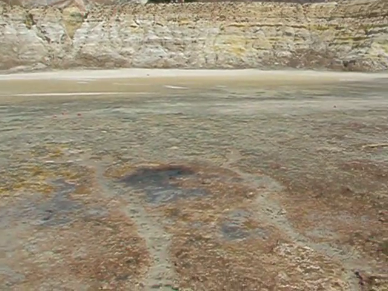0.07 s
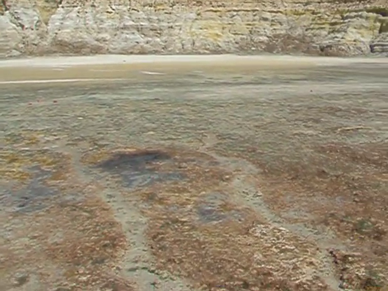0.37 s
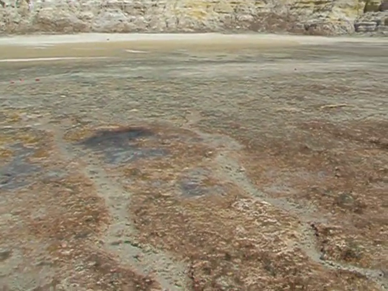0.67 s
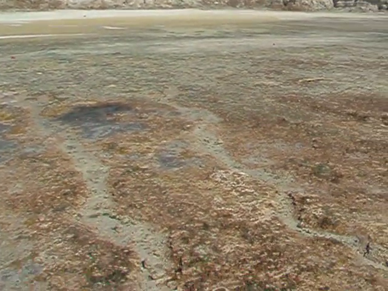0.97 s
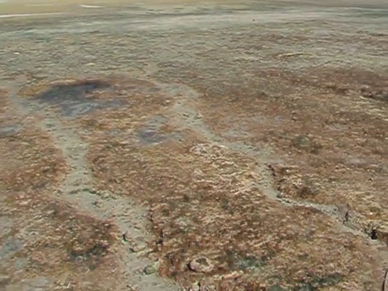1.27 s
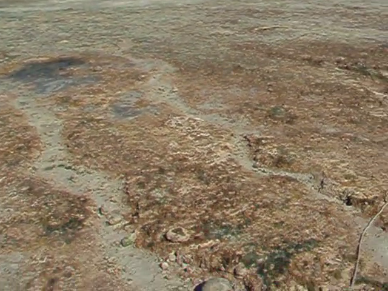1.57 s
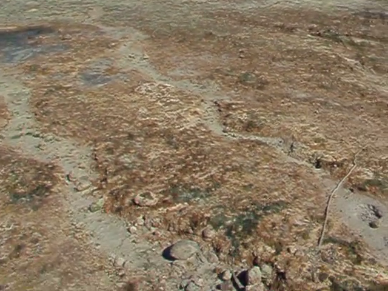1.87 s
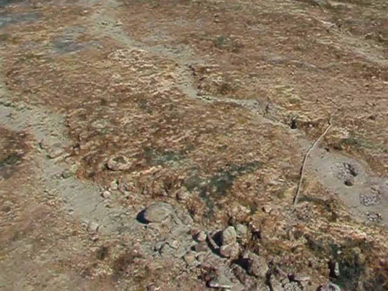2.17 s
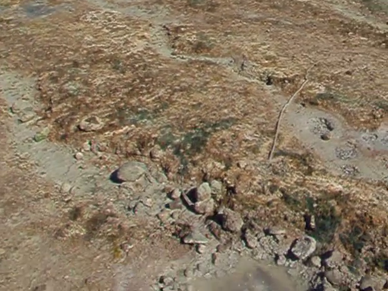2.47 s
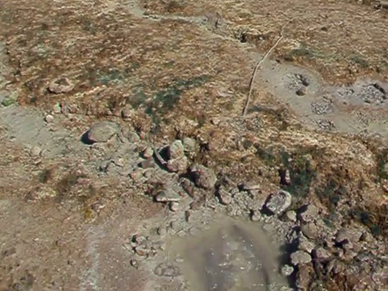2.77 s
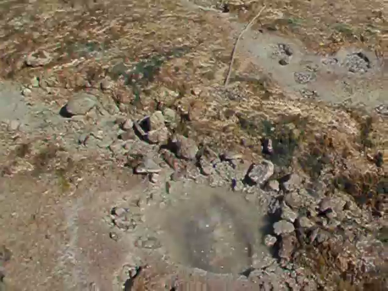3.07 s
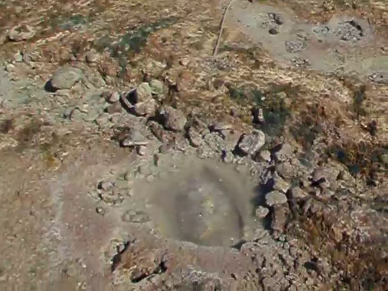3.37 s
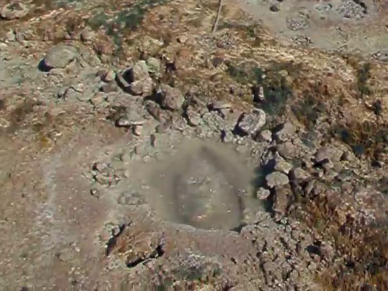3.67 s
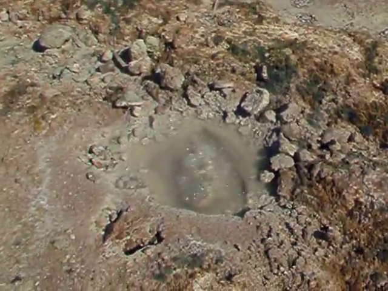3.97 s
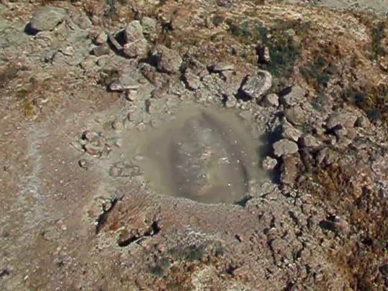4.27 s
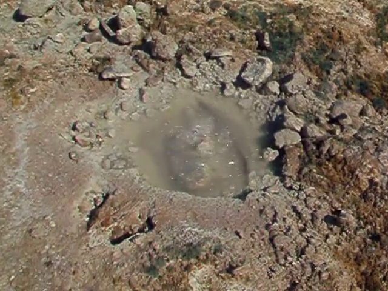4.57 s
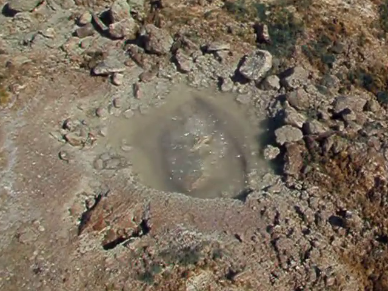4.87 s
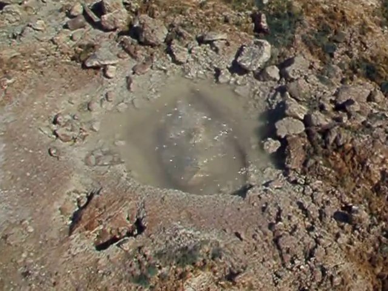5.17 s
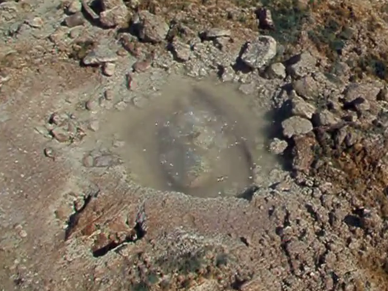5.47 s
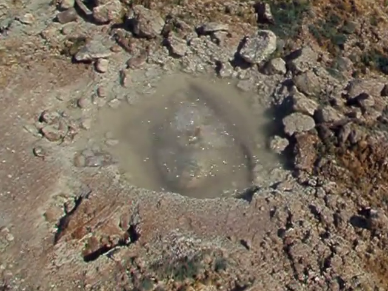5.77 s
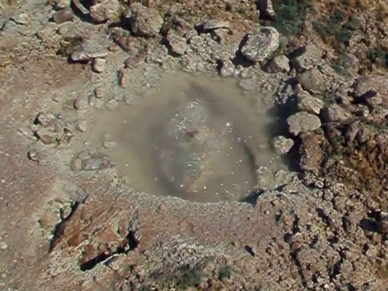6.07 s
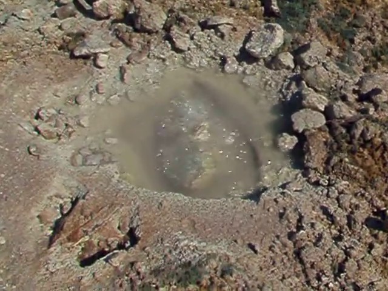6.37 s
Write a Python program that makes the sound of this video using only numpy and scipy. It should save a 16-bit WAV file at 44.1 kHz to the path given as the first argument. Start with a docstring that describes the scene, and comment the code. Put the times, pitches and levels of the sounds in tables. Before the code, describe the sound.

In an open volcanic crater, wind buffets a hand-held microphone with low rumbles and fluttering thumps, hardest in the first 0.7 seconds, around 1.5 seconds and again near 2.6 seconds. Behind it, a broad hiss of steam mixed with the fizz of tiny bubbles starts faint and grows until about 3 seconds, then holds steady. From roughly 1 to 2 seconds the boiling of a small muddy pool emerges, a churning, unevenly surging gurgle with deeper gulps, swelling as the microphone comes closer. Single larger bubbles plop softly from about 2 seconds and become more frequent and distinct from 4 seconds on, some lower, some higher. A few droplets spit with short, high ticks between 1 and 5.5 seconds. After 3 seconds the wind is only a light rumble, with small gusts near 5.5 and 6 seconds. The hissing and bubbling continue to the end at about 6.5 seconds.

```python
"""A volcanic crater: a small hot spring boils, growing louder as a hand-held microphone comes closer.
Steam hisses, tiny bubbles fizz, droplets spit; larger bubbles gurgle and plop in the muddy pool,
each a gas pocket ringing for a few cycles. Gusts rumble and thump on the microphone,
hardest in the first three seconds."""
import sys
import numpy as np
from scipy import signal
from scipy.fft import rfft, irfft
from scipy.io import wavfile
from scipy.ndimage import uniform_filter1d

SR = 44100
rng = np.random.default_rng(int(sys.argv[2]) if len(sys.argv) > 2 else 0)


def wrap_up_sound(samples):
    """Save the sound to the file named by the first command line argument, as 16-bit audio."""
    columns = np.atleast_2d(samples).T
    # keep every value between -1 and 1, then stretch to whole-number steps
    tamed = np.clip(columns, -1, 1)
    steps = np.round(tamed * 32767).astype(np.int16)
    wavfile.write(sys.argv[1], SR, steps)


N = 287664
TIME_S = np.arange(N) / SR

# gusts on the microphone: start_s, hold_s, relative_db, turbulence_top_hz
WIND_GUSTS = [(.01, .035, -31.5, 450), (0.1, 0.023, -26.5, 654), (0.325, .05, -32.5, 200),
              (0.39, 0.012, -30, 700), (0.47, 0.092, -26, 620), (0.588, .15, -31, 320),
              (.88, .36, -39, 100), (1.382, 0.18, -26.5, 218), (1.563, 0.026, -20, 240),
              (1.75, .02, -33, 70), (2.063, 0.036, -36, 70), (2.26, 0.035, -39, 70), (2.479, .07, -24, 170),
              (2.568, 0.079, -25, 448), (2.7, .15, -29.5, 130), (3.166, 0.016, -30, 79.5),
              (3.26, 0.045, -30, 80), (4.064, .04, -35, 70), (4.497, 0.16, -36.5, 70),
              (5.548, 0.1, -29, 70), (5.99, 0.21, -32, 70), (6.387, 0.14, -32, 90)]


def steam(flicker_db=0.21, fizz_db=-8):
    """Steam hisses out of the hot ground, mixed with the fizz of tiny bursting bubbles."""
    # hiss as the pool nears: time_s, level_db
    approach = [(0, -34.5), (1.07, -29), (2.4, -24), (3.18, -22.5), (6.52, -22.5)]
    # hiss spectrum: freq_hz, gain_db
    spectrum = [(60, -9.5), (250, -8), (600, 1.5), (1100, 1), (1800, 1), (2700, 1.35), (3800, 1),
                (5000, 1.46), (6300, 3), (7100, 0), (7800, -5), (8300, -21.5), (8700, -78.5)]
    jet = rng.standard_normal(N) * undb(flicker_db * walk(35))
    fizz = swarm(1496, 8480, cycles=4.05, spread_db=0.2, rise=0.064, count=16000)
    return colour(jet + undb(fizz_db) * fizz, spectrum) * undb(curve(approach))


def boiling(surge_db=0.63, churn_db=-6, water_db=-1.12, gulp_db=-9.0):
    """Gas rises in uneven surges: a crowd of short bubbles and deep gulps over churning water."""
    # boil as the microphone leans over the pool: time_s, relative_db
    approach = [(0, -42), (.9, -41), (1.8, -33), (2.8, -28), (4.2, -26), (6.52, -25)]
    # bubbling water spectrum: freq_hz, gain_db
    water_spectrum = [(80, -35), (200, -5.5), (330, -4), (450, 0), (570, 1), (730, -6), (950, -5.5),
                      (1250, -5), (1700, -8.5), (2600, -14.5), (4500, -50)]
    # deep gulp spectrum: freq_hz, gain_db
    gulp_spectrum = [(50, -28.5), (120, -10), (210, -1), (330, -3.5), (450, -7.5), (700, -22)]
    crowd = swarm(287, 3150, cycles=6.7, spread_db=3.0, rise=0.22, count=5000)
    churn = colour(rng.standard_normal(N), water_spectrum)
    water = unit(colour(crowd, water_spectrum) + undb(churn_db) * churn)
    gulps = swarm(100.0, 523, cycles=5.8, spread_db=2, rise=0.15, count=1200)
    pool = water * undb(water_db) + colour(gulps, gulp_spectrum) * undb(gulp_db)
    return pool * undb(curve(approach) + surge_db * walk(22))


def plops(plop_db=-2.5, cycles=7.1, snap_db=-5, snap_hz=2600, splash_db=-13, splash_s=0.012):
    """Large bubbles ring, their skin snaps, and each sheds three smaller ones."""
    # large bursting bubbles: start_s, pitch_hz, relative_db
    bursts = [(1.991, 600, -17), (2.062, 580, -14.5), (2.264, 533, -18), (2.984, 533, -18),
              (3.18, 605, -17), (3.957, 1210, -10.5), (4.043, 530, -13.5), (4.402, 1170, -10),
              (4.651, 467, -15), (4.806, 563, -13.5), (4.941, 480, -19), (4.952, 1110, -7.5),
              (5.064, 1130, -10), (5.111, 500, -14.5), (5.274, 514, -11), (5.433, 1170, -10.5),
              (5.533, 1100, -9.5), (5.536, 516, -10), (5.909, 1070, -12.5), (6.211, 1680, -9),
              (6.352, 480, -13), (6.434, 1010, -7), (6.444, 1360, -11), (6.506, 506, -15)]
    out = np.zeros(N)
    for start_s, hz, db in bursts:
        add(out, start_s, undb(db + plop_db) * bubble(hz, cycles, rise=0.13))
        add(out, start_s + 1 / hz, undb(db + snap_db) * bubble(snap_hz, cycles=2.6, rise=0))
        for delay, height in rng.random((3, 2)):
            splash = bubble(hz * 2 ** (height * 0.65), cycles, rise=0.31)
            add(out, start_s + delay * splash_s, undb(db + splash_db) * splash)
    return out


def spits(pitch_hz=4300, trim_db=-4):
    """Droplets spit above the simmer, each a short high tick."""
    # spitting droplets: start_s, relative_db
    droplets = [(1.09, -9), (1.938, -4), (3.249, -8), (3.883, -9), (3.989, -12), (4.108, -9), (4.471, -6),
                (5.351, -9)]
    out = np.zeros(N)
    for start_s, db in droplets:
        add(out, start_s, undb(db + trim_db) * bubble(pitch_hz, cycles=3, rise=0))
    return out


def wind_buffets(low_hz=125, edge_hz=980, eddy_db=1.0, flutter_db=4.0, gust_db=4, sharpness=1.6):
    """Gust crests tear into fluttering turbulence; each strong eddy is a brief pressure swing."""
    # eddies thumping the diaphragm: centre_s, pitch_hz, relative_db
    eddies = [(.009, 327, -12), (.035, 520, -9.5), (.113, 260, -15.5), (.181, 480, -18),
              (0.272, 400, -23.5), (0.405, 196, -13.5), (.412, 520, -10.5), (.473, 397, -13.5),
              (.519, 280, -12.5), (0.56, 427, -8), (.633, 450, -15), (1.453, 192, -8.5), (1.463, 230, -10),
              (1.559, 457, -5), (1.595, 540, -9.5), (1.597, 200, -7), (2.572, 127, -10.5),
              (3.167, 90, -17.5), (3.27, 105, -18)]
    out = np.zeros(N)
    flutter = undb(flutter_db * walk(130))
    air = unit(band(rng.standard_normal(N) * flutter, edge_hz, "low"))
    for start_s, hold_s, db, top_hz in WIND_GUSTS:
        crest = gust(start_s, hold_s) ** sharpness
        out += undb(db + gust_db) * crest * band(air, top_hz, "low")
    out = band(out, low_hz, "high")
    for centre_s, hz, db in eddies:
        turns = np.arange(-2, 2, hz / SR)
        thump = np.cos(2 * np.pi * turns) * np.exp(-(turns / 0.57) ** 2)
        add(out, centre_s - 2 / hz, undb(db + eddy_db) * thump)
    return band(out, edge_hz, "low", order=5)


def wind_rumble(breeze_db=-38.5, fade_db_per_s=1.54, sway_db=2.5, steadiness=0.81, trim_db=-1):
    """Wind presses on the microphone: gusts stand out of a swaying, fading breeze."""
    # wind pressure spectrum: freq_hz, gain_db
    spectrum = [(15, -26), (30, -10.5), (55, -3.5), (95, 0.5), (135, -3), (200, -8.5), (300, -13.5),
                (600, -37), (1200, -65)]
    breeze = undb(breeze_db - fade_db_per_s * TIME_S + sway_db * walk(13))
    gust_power = sum((undb(db) * gust(start_s, hold_s)) ** 2 for start_s, hold_s, db, _ in WIND_GUSTS)
    pressure = np.sqrt(breeze ** 2 + gust_power)
    flow = colour(rng.standard_normal(N), spectrum)
    swell = np.sqrt(uniform_filter1d(flow ** 2, size=3000))
    even_flow = unit(flow / swell ** steadiness)
    return even_flow * pressure * undb(trim_db)


def gust(start_s, hold_s, attack_s=0.022, release_s=0.045):
    """Pressure envelope: builds to 1 at start_s, holds, dies away."""
    early_s = np.maximum(start_s - TIME_S, 0)
    late_s = np.maximum(TIME_S - start_s - hold_s, 0)
    return np.exp(-early_s / attack_s - late_s / release_s)


def bubble(hz, cycles, rise, onset_cycles=0.68):
    """A gas pocket rings briefly; its pitch climbs by the fraction rise as it surfaces."""
    turns = np.arange(int(cycles * SR / hz) + 2) * hz / SR
    age = turns / cycles
    onset = 1 - np.exp(-(turns / onset_cycles) ** 2)
    envelope = np.exp(-np.log(20) * age) * (1 - age ** 2) * onset
    return np.sin(2 * np.pi * turns * (1 + rise * age / 2)) * envelope / envelope.max()


def swarm(low_hz, high_hz, cycles, spread_db, rise, count):
    """Many bubbles at random moments, rms 1."""
    out = np.zeros(N)
    for when, height, strength, length in rng.random((count, 4)):
        hz = low_hz * (high_hz / low_hz) ** height
        db = -spread_db * np.log(1 - 0.97 * strength)
        gain = hz * undb(db)  # about equal power per Hz
        add(out, when * N / SR, gain * bubble(hz, cycles * (0.5 + length), rise))
    return unit(out)


def undb(db):
    """Decibels to gain."""
    return 10 ** (np.asarray(db) / 20)


def unit(x):
    """Scale to rms 1."""
    return x / np.sqrt(np.mean(x ** 2))


def curve(rows):
    """Join (time_s, value) rows by straight lines."""
    return np.interp(TIME_S, *np.transpose(rows))


def colour(x, spectrum):
    """Filter by (freq_hz, gain_db) rows, rms 1."""
    hz, db = np.transpose(spectrum)
    bins_hz = np.maximum(np.arange(N // 2 + 1) * SR / N, 1)
    gain = undb(np.interp(np.log(bins_hz), np.log(hz), db))
    return unit(irfft(rfft(x) * gain, N))


def band(x, hz, kind, order=2):
    """Butterworth low-pass or high-pass."""
    return signal.sosfilt(signal.butter(order, hz, kind, fs=SR, output="sos"), x)


def walk(rate_hz):
    """Random levels joined by straight lines, rms 1."""
    return unit(np.interp(TIME_S * rate_hz, np.arange(N), rng.standard_normal(N)))


def add(out, start_s, sound):
    """Mix a short sound in at start_s."""
    start = int(np.clip(start_s * SR, 0, N))
    out[start:start + len(sound)] += sound[:N - start]


def scene():
    """Pool and wind at one microphone, in the open air."""
    return (steam() + boiling() + plops() + spits() + wind_rumble() + wind_buffets())[None]


def record(dry):
    """Steep low-pass on the top treble."""
    top_hz = 8500
    return signal.sosfilt(signal.ellip(10, 0.2, 80, top_hz, fs=SR, output="sos"), dry)


dry = scene()
out = record(dry)
wrap_up_sound(out)
```